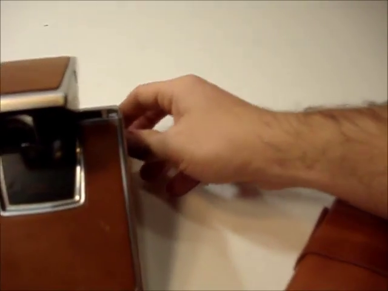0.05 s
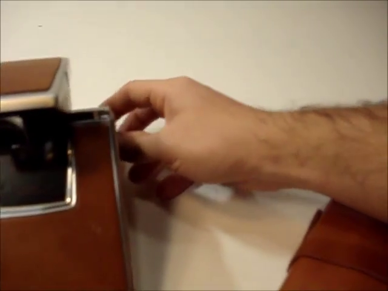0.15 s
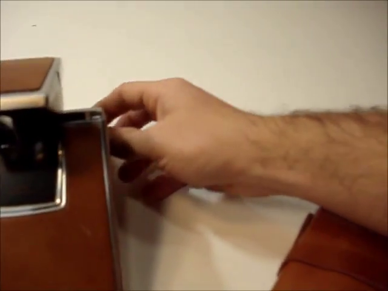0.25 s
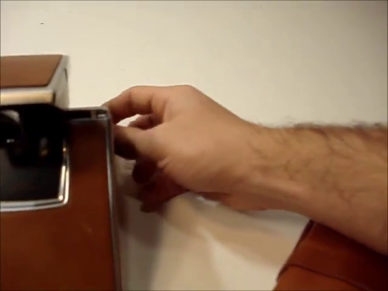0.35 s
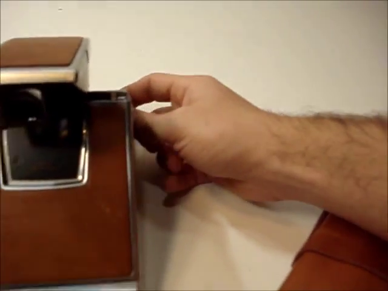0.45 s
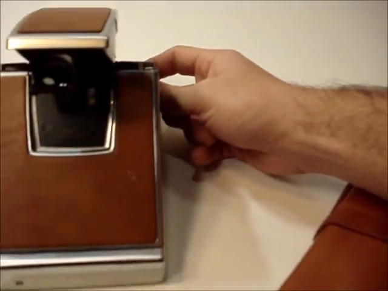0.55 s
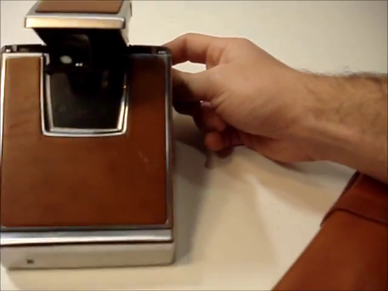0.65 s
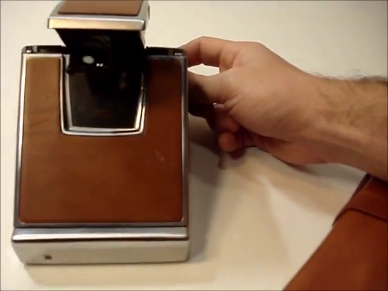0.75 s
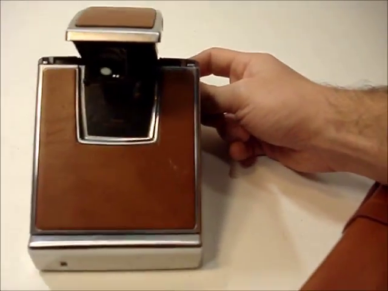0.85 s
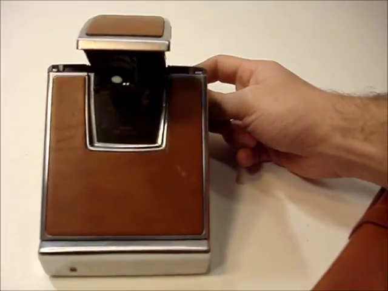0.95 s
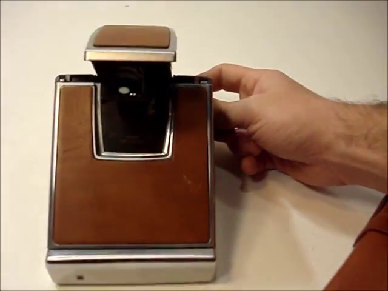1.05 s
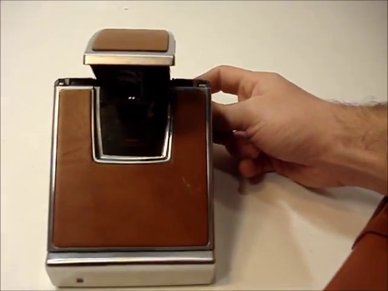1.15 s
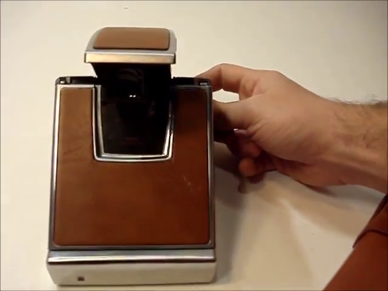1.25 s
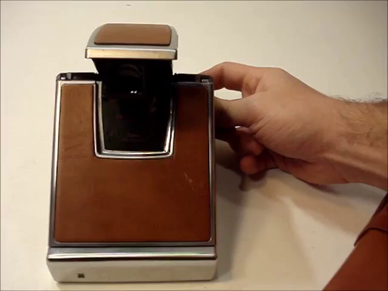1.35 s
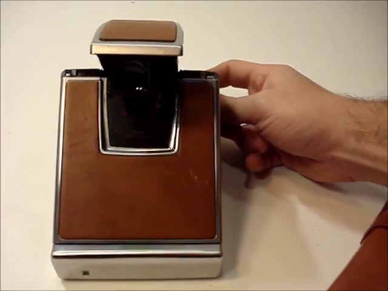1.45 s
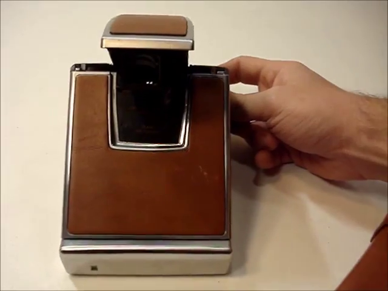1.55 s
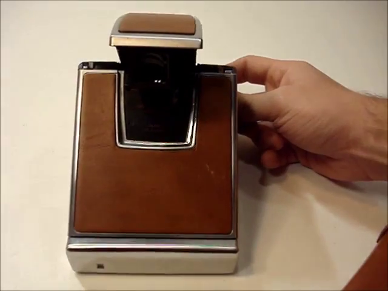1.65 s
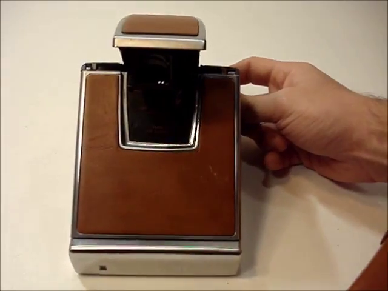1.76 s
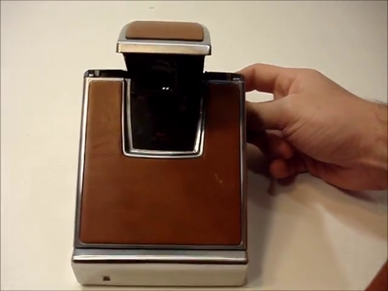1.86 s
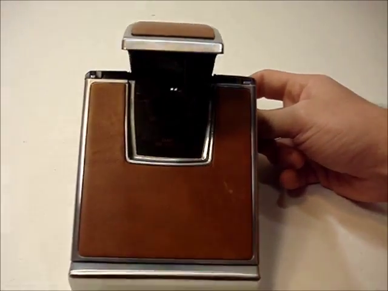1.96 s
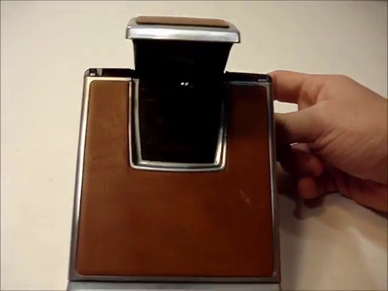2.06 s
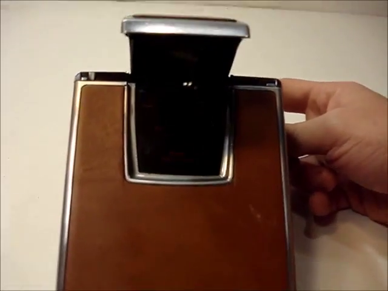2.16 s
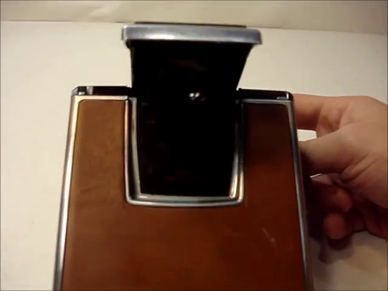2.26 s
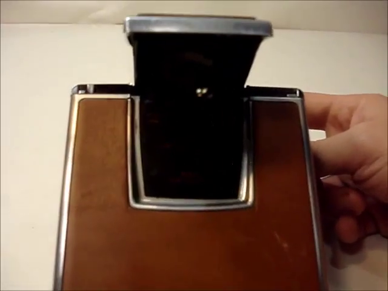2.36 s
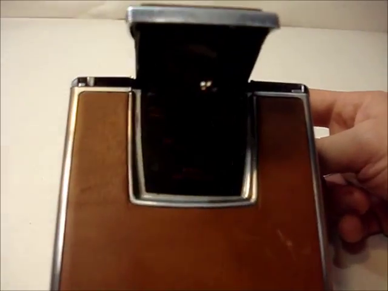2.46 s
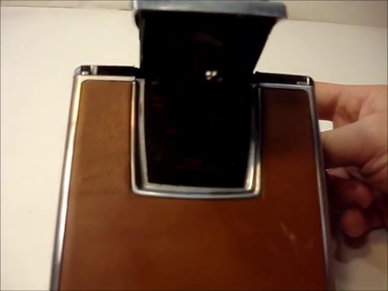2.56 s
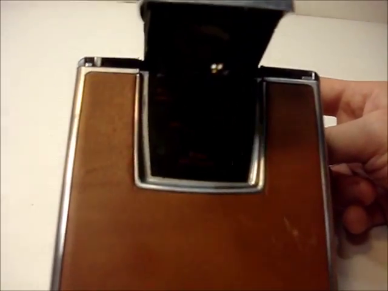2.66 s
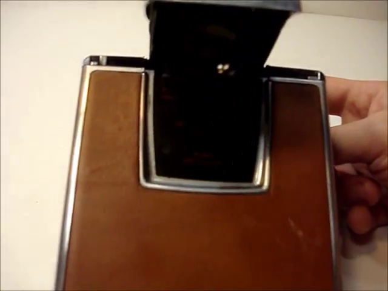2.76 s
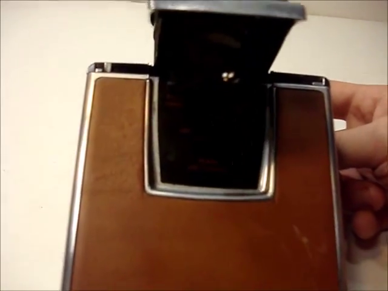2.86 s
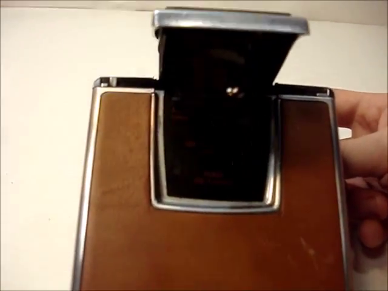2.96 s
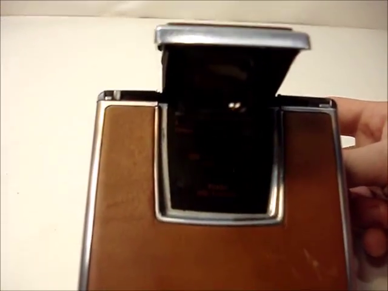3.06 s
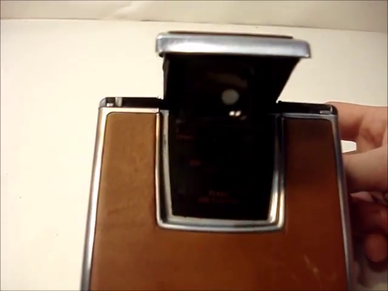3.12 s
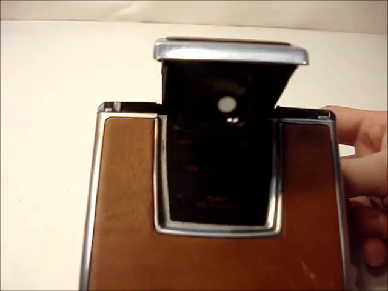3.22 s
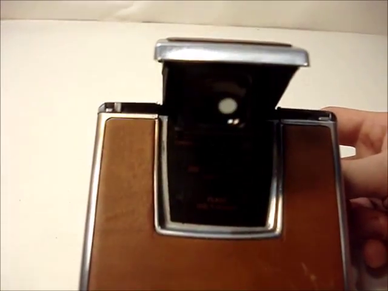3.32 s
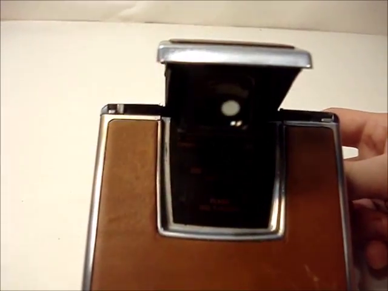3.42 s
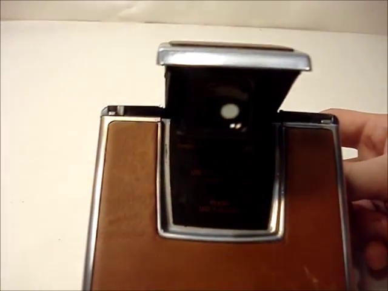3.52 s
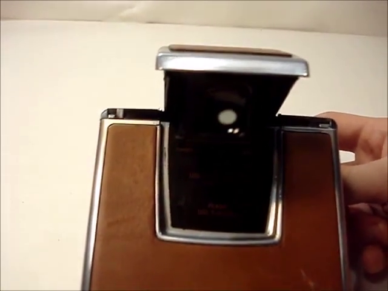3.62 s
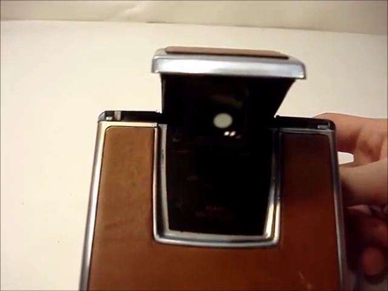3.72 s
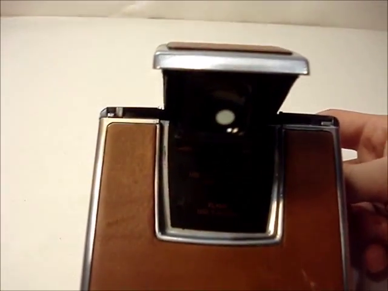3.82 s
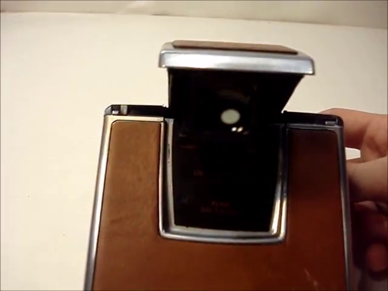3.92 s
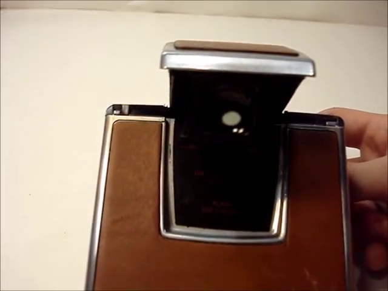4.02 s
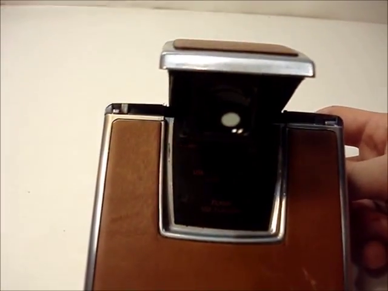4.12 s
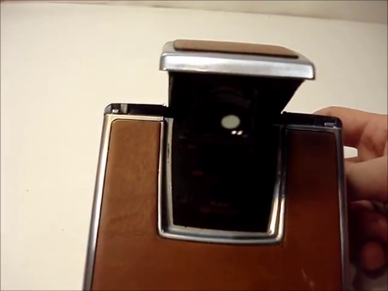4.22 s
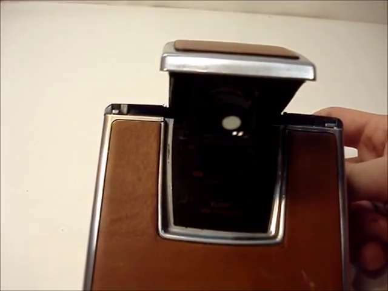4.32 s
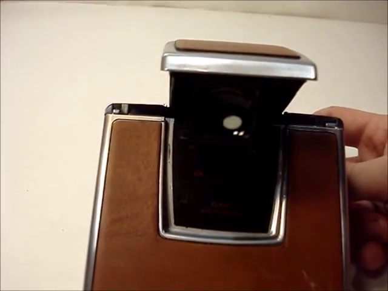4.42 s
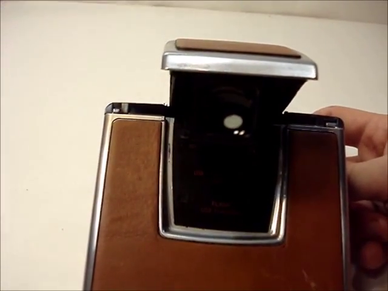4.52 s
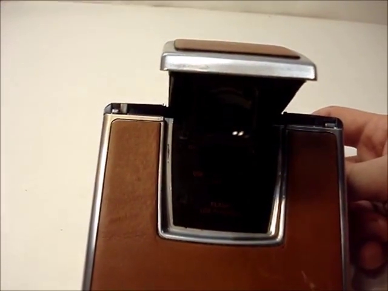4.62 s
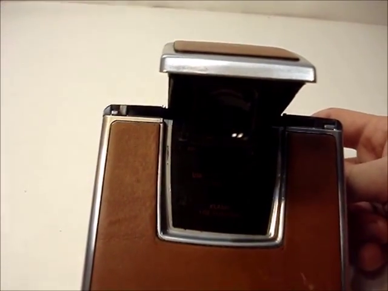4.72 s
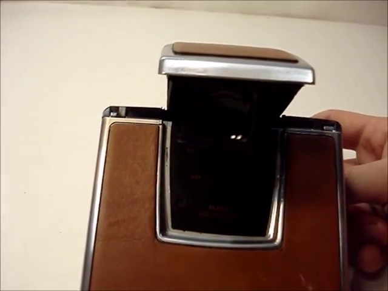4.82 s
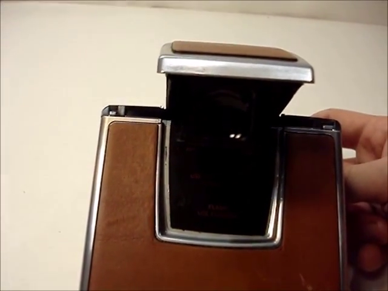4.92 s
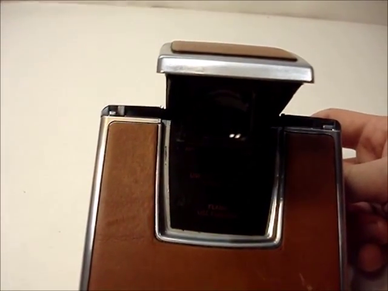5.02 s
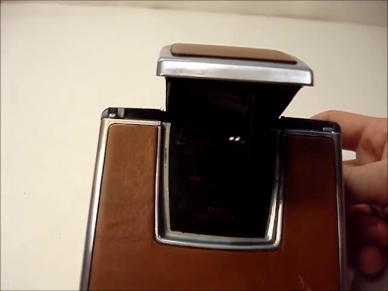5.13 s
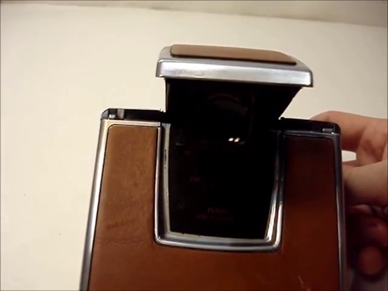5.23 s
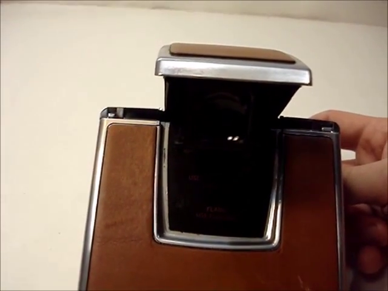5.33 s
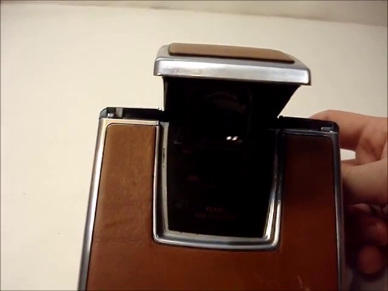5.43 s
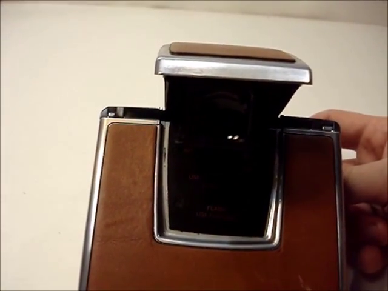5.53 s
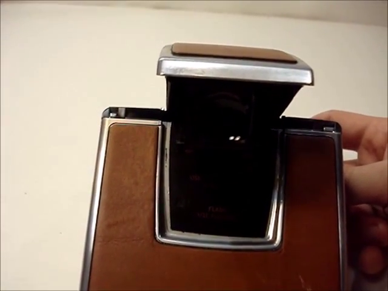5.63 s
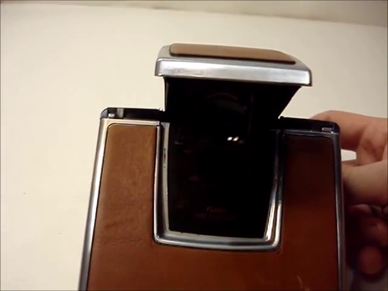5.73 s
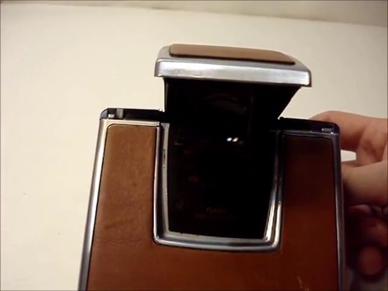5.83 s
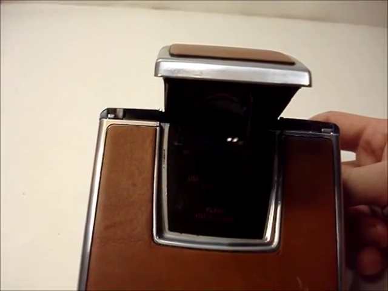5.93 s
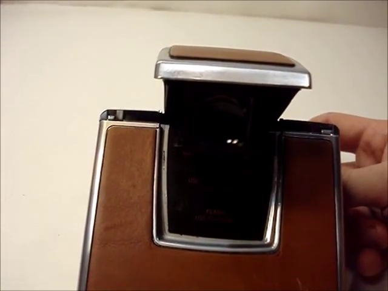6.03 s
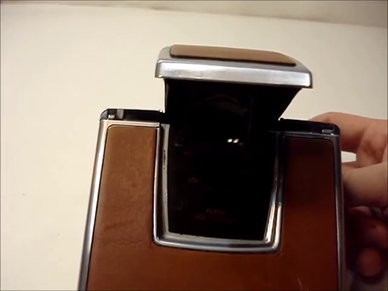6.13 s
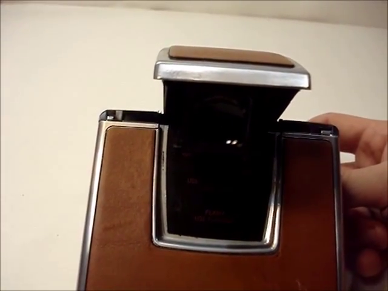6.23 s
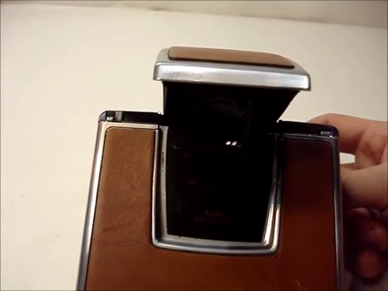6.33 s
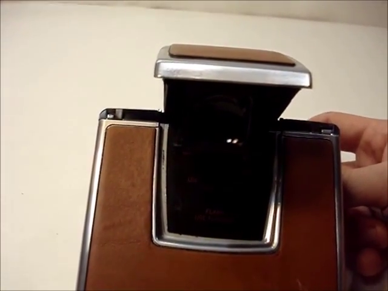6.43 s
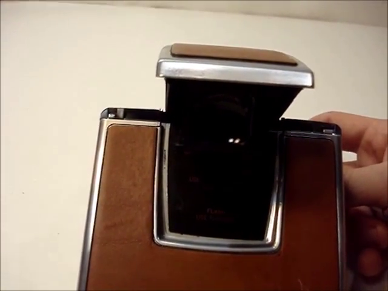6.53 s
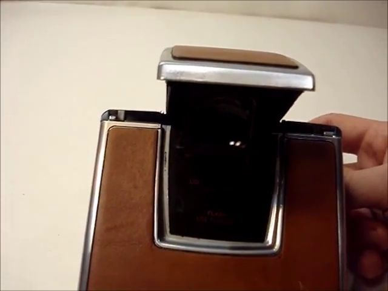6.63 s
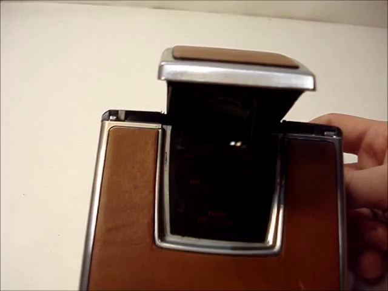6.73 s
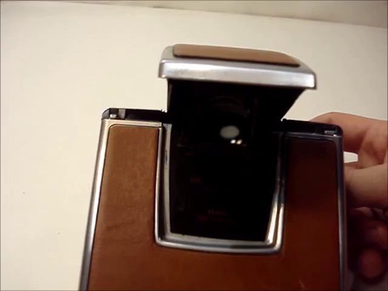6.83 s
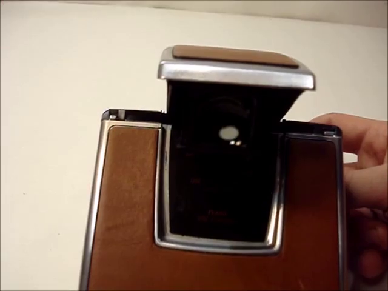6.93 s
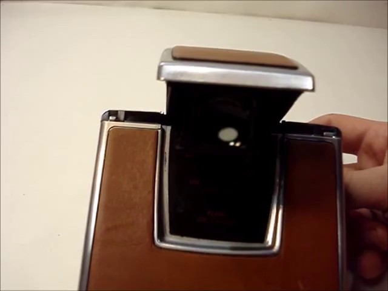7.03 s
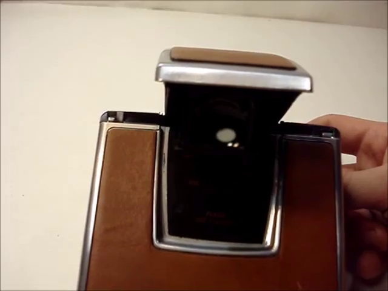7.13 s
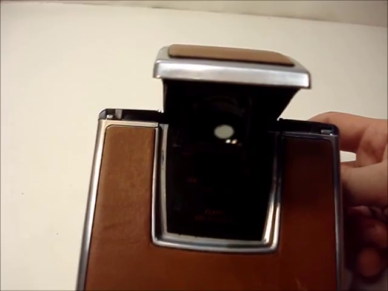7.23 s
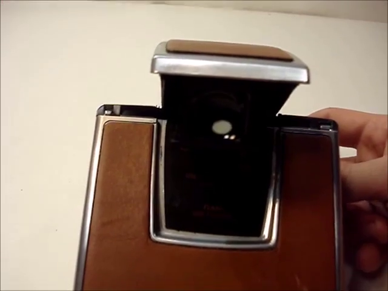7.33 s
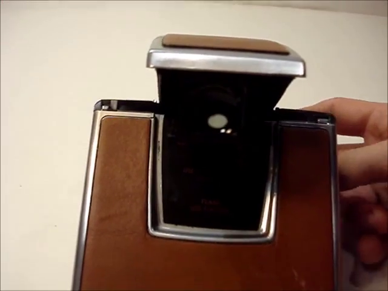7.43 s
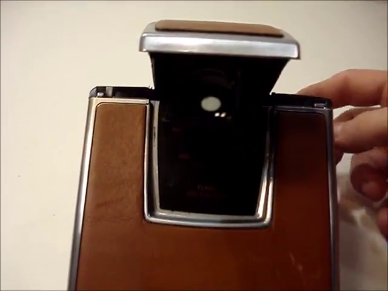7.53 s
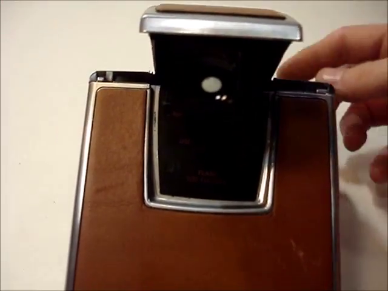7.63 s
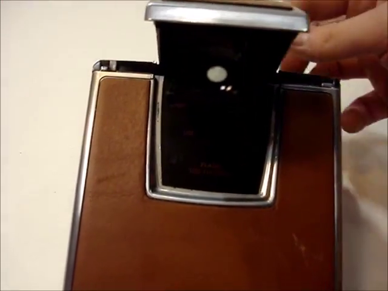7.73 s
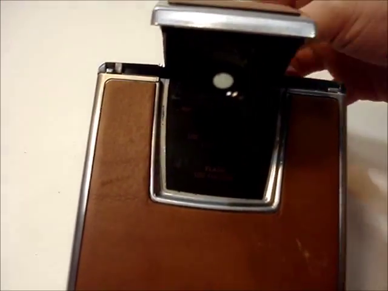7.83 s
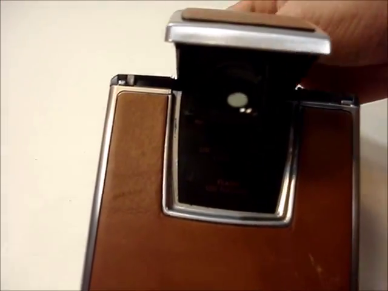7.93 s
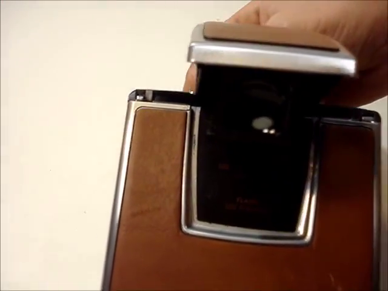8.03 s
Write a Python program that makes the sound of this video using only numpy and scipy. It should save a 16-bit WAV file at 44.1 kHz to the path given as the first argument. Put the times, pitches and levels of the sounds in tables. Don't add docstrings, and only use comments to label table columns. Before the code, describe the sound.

A folding instant camera on a table fires twice: button click, short motor whirr, hard hollow shutter clack, longer gear whirr, then a soft clunk and faint springy hum.

```python
import sys
import numpy as np
from scipy import signal
from scipy.io import wavfile
from scipy.ndimage import uniform_filter1d, minimum_filter1d

SR = 44100
rng = np.random.default_rng(int(sys.argv[2]) if len(sys.argv) > 2 else 0)


def gain_from_db(level_db):
    decades = np.asarray(level_db, float) / 20
    return 10 ** decades


def unload_audio(sound):
    columns = np.transpose(np.atleast_2d(sound))
    steps = np.round(np.clip(columns, -1, 1) * 32767)
    wavfile.write(sys.argv[1], SR, steps.astype(np.int16))


N = 356019

SWITCH_ON_S = [
    1.272,
    1.585,
    4.719,
    5.065,
]
# (time [s], settled shaft speed [turns/s], gear rattle [dB])
RAISE_1 = [(1.316, 149, -28), (1.36, 151, -25), (1.39, 151, -24.5), (1.42, 155, -22)]
RAISE_2 = [(4.76, 135, -28.5), (4.82, 138, -28), (4.872, 137, -24)]
# (time [s], settled shaft speed [turns/s], gear rattle [dB])
WIND_1 = [(1.74, 160, -28), (1.8, 155.5, -28), (1.852, 150.8, -27.5), (1.961, 155.3, -29),
          (2.175, 155.7, -28.5), (2.305, 148.2, -26), (2.851, 141, -26), (3.145, 138, -26),
          (3.295, 122, -26)]
WIND_2 = [(5.234, 138.5, -28), (5.36, 127.8, -27.5), (5.494, 135.3, -28.5), (5.718, 135.5, -27),
          (5.888, 129.3, -27), (6.07, 131.5, -26.5), (6.33, 127.6, -27.5), (6.82, 124.2, -27.5),
          (6.99, 108, -31)]
# (time [s], length [s], shaft order [1], level
# [dB])
SURGES = [(1.395, .04, 3, 4.5), (1.37, .02, 6, 3), (1.7, .04, 9, 8), (2.26, .06, 9, -9),
          (2.975, .06, 6, 9.5), (3.2, .06, 6, 5), (3.228, .022, 0, 6), (4.85, .04, 3, 3), (4.835, .03, 6, 5),
          (6.02, .19, 6, 9.5), (6.918, .018, 0, 7.5), (6.91, .06, 7, 10), (6.76, .07, 7, -3),
          (5.32, .12, 12, 5), (5.5, .3, 4, -6), (6.4, .12, 4, 5), (6.0, .1, 5, 6), (2.0, .25, 12, 3),
          (4.775, .02, 9, 4), (1.305, .025, 9, 7), (1.635, .015, 9, 3)]
# (frequency [Hz], width [Hz], level [dB])
FRAME = [(345, 44, -36.5), (378, 34, -33), (405, 26, -31.7), (436, 34, -26), (468, 30, -31.3),
         (700, 90, -36), (795, 90, -37.5), (878, 36, -36), (935, 50, -47), (1125, 30, -44), (1178, 36, -41),
         (1232, 56, -43), (1362, 34, -40), (1398, 36, -33)]
SHAFT_ORDERS = {1: -38, 2: -31, 4: -17, 5: -20, 7: -21.5, 8: -19, 10: -19.5, 11: -21.5, 12: -17, 13: -19,
                14: -20.5, 15: -20.5, 16: -20.5}
# (shaft order [1], blur [Hz], level [dB])
MESH = [(23.83, 27, -18.5), (35.87, 80, -19), (47.4, 240, -14.5)]
# (frequency [Hz], density [dB per Hz])
FAR = [(59, -62), (100, -37), (367, -29), (437, -13), (530, -13), (607, -18), (986, -17.5), (1400, -15.5),
       (3280, -9.5), (7130, -7.5), (9170, -7), (10300, -25.5), (13400, -78), (22000, -120)]
NEAR = [(59, -64), (100, -30), (326, -36), (389, -10), (454, -22), (766, -15), (967, -25), (2060, -12.5),
        (4140, -10.5), (4650, -9.5), (7850, -7.5), (10300, -17.5), (13400, -76), (22000, -120)]
# (frequency [Hz], width [Hz], gain [dB])
SHELL = [(122.6, 9.2, 11.5), (497, 36, -10), (518, 16, 11.5), (517, 17, -6.5), (570, 40, 3), (770, 31, 7.5),
         (874.5, 13, 13.5), (1008, 30, 4.5), (1238, 85, 5.5), (1438, 140, 4), (1626, 21, 7.5),
         (1770, 26, 7), (1851.6, 28, 7), (1960, 22, 1.5), (2050, 130, 6), (2620, 240, 6.5), (3440, 118, 7),
         (4420, 89, 6.5), (4705, 190, 8.5), (5190, 230, 7), (5700, 58, 6), (6340, 140, -1.5),
         (7260, 216, 4.5), (7330, 75, 5)]
PARTS = {"button": (0, -20, -20, .06, .0028), "latch": (0, -17, -21, .052, .0021),
         "lever": (-5, 0, -14, .145, .0026), "pin": (-8, 0, -18, .045, .0022),
         "body": (-22, -18, 0, .045, .002), "slap": (0, -18, 0, .066, .0024),
         "shutter": (-9, -15, 0, .06, .0023), "mirror up": (0, -5, -13, .05, .0048),
         "mirror home": (0, -25, -15, .09, .008)}
STRIKES = {"latch": [(.245, -38), (1.2755, -14.5), (1.5304, -14), (1.5975, -12.5), (3.2204, -11),
           (3.2345, -14), (4.7146, -12.5), (4.9886, -12.5), (5.063, -30), (5.0731, -13), (6.9116, -11)],
           "button": [(1.2592, -18), (4.6968, -14.5)], "lever": [(1.48, -27), (4.9467, -26.5)],
           "pin": [(1.5134, -25), (6.93, -25)], "body": [(1.3189, -25), (1.5444, -11), (3.2794, -17.5),
           (5.0193, -13)], "slap": [(1.4294, -20), (4.8748, -18), (5.0094, -14.5), (6.9694, -18)],
           "shutter": [(1.5219, 1.8), (4.9954, -1.5)], "mirror up": [(1.406, -8), (4.858, -7)],
           "mirror home": [(3.2134, -14), (6.9051, -19)]}
# (frequency [Hz], density [dB per Hz])
CHATTER = [(880, -1.5), (1500, -8.5), (2300, -11.5), (2980, 2.5), (3580, -3.5), (7520, -3.5), (10300, -16),
           (13400, -68), (22000, -120)]
# (frequency [Hz], level [dB], t60 [s])
CLINK = [(1195, -5, 0.004), (1515, 2, 0.0085), (1740, -12, 0.0048), (2010, 1, 0.0071)]
# (frequency [Hz], level [dB], t60 [s])
KNOCK = [(230, -7.5, 0.28), (306, -3.5, 0.06), (430, -2, .045), (573, 6.5, 0.044), (659, 16.5, 0.021),
         (725, 7.5, 0.05), (940, -32, 0.046)]
# (time [s], peak [dB], length [s])
PUFFS = [
    (1.4075, -24.5, .0035),
    (1.519, -35, .008),
    (3.219, -23, .017),
    (4.862, -24, .0038),
    (4.9945, -22, .006),
    (6.91, -22, .016),
]
# (time [s], level [dB])
PLUCKS = [
    (3.22, 1.5),
    (6.92, -.6),
]
# (frequency [Hz], level [dB])
SPRING = [(349.9, -61), (1050, -63.5), (1400, -62.5), (1755, -61.5), (2105, -59.5), (2455, -69),
          (2805, -67), (3505, -77), (4560, -72), (5259, -77), (6315, -99)]
# (frequency [Hz], density [dB per Hz])
HISS = [(12, -41), (20, -41), (80, -11), (153, -4.5), (303, -2), (597, -4.5), (796, -6.5), (907, -7.5),
        (2860, -14.5), (7730, -20.5), (10300, -27), (13400, -56), (22000, -120)]
# (time [s], length [s], level below 1 kHz [dB], level above 2 kHz [dB])
STARVED = [
    (1.243, .014, 0, -25),
    (1.498, .016, -25, -30),
    (4.664, .029, 0, -28),
    (4.976, .011, -6, -6),
]
# (time [s], depth kept under the local top [dB])
COARSE = [(1.75, 9), (1.862, 7), (2.35, 7), (2.435, 8), (3.19, 10), (3.228, 6), (5.36, 9), (5.53, 9),
          (5.69, 9), (6.0, 9), (6.05, 4), (6.215, 8), (6.26, 9), (6.34, 8), (6.63, 4.5), (6.685, 7),
          (6.728, 7), (6.79, 8)]

SPIN_UP_S, SILENT_S = .048, .009
RATTLE_DB_PER_OCTAVE = 6.5
LEAK_DB = -52
SHAKE_DB = 6.0
THIN_HZ, OPEN_HZ, ROLLED_OFF_HZ = 300, 20000, 4300
STRIKE_SAMPLES, PUFF_SAMPLES = 8000, 9000
JOLT_DB, JOLT_S, SAG_DB_PER_S = 13, .05, 3.0
DAMPED_S, DAMP_DB_PER_S, HUM_S = .47, 110, .78
HISS_DB, ROOM_DB = -51.5, -9.5
COARSE_S, EDGE_HZ = .029, 10220


def motor(on, rows, colour):
    s, settled, load_db = np.transpose(rows)
    t = np.arange(on + SILENT_S, s[-1], 1 / SR)
    spun = 1 - np.exp(-(t - on) / SPIN_UP_S)
    speed = spun * np.interp(t, s, settled)
    rattle_db = np.interp(t, s, load_db) + RATTLE_DB_PER_OCTAVE * np.log2(spun)
    wobble = 1 + 0.001 * drift(len(t), per_s=6.54)
    angle = 2 * np.pi * np.cumsum(speed * wobble) / SR
    acceleration = uniform_filter1d(np.gradient(speed) * SR, size=900)
    strain = np.clip(abs(acceleration) / 1200, .03, .8)
    poles = pole_tones(t, speed, angle, strain)
    lines = shaft_orders(t, speed, angle) + tooth_mesh(t, speed, angle, strain)
    rattle = gain_from_db(-1.03 + surge_db(t, 0)) * gear_rattle(angle, colour)
    whir = gain_from_db(rattle_db) * (rattle + lines)
    fade = signal.windows.tukey(len(t), 0.042 / (s[-1] - t[0]))
    return t[0], poles * fade, whir * fade


def pole_tones(t, speed, angle, strain):
    poles = np.zeros(len(t))
    for order, shake in ((3, .1), (6, 1), (9, 1)):
        db = frame_db(order * speed[::16]) + surge_db(t[::16], order)
        db = np.repeat(db, 16)[:len(t)]
        db += .6 * drift(len(t), per_s=6.0) + SHAKE_DB * shake * strain
        shaken = shake * strain
        grain = np.sqrt(1 - shaken) + np.sqrt(shaken) * fuzz(len(t), width_hz=64)
        body = 1 / (1 + ((order * speed - 800) / 90) ** 2)
        grain *= 1 - shaken * (1 - body)
        poles += np.sqrt(2) * gain_from_db(db) * (grain * np.exp(1j * order * (angle + 1))).real
    return poles


def shaft_orders(t, speed, angle):
    lines = np.zeros(len(t))
    for order in set(range(1, 64)) - {3, 6, 9}:
        level_db = SHAFT_ORDERS.get(order, -17 - 0.32 * order) - 2.0 + surge_db(t[::64], order)
        wander = gain_from_db(level_db + min(.3 * order, 1.8) * drift(len(t), per_s=3, size=64))
        slip = 0.022 * order * drift(len(t), per_s=8.4) + 2 * np.pi * rng.random()
        body = np.repeat(wander * bumps(order * speed[::64]) ** 1.4, 64)[:len(t)]
        lines += body * np.cos(order * angle + slip)
    return lines


def tooth_mesh(t, speed, angle, strain):
    bands = np.zeros(len(t))
    for order, blur_hz, db in MESH:
        swell = gain_from_db(db + SHAKE_DB * strain + 1.2 * drift(len(t), per_s=5))
        swell *= np.repeat(bumps(order * speed[::64]), 64)[:len(t)]
        bands += np.sqrt(2) * swell * (fuzz(len(t), blur_hz) * np.exp(1j * order * angle)).real
    return bands


def gear_rattle(angle, colour):
    count = len(angle)
    beat = 3 * angle / (2 * np.pi) + .25 * fuzz(count, width_hz=150).real
    knocks = np.diff(np.floor(np.maximum.accumulate(beat)), prepend=0)
    kicks = knocks * gain_from_db(3.0 * rng.standard_normal(count))
    teeth = 1.2 + evened(signal.lfilter([1], [1, -np.exp(-1 / (.001 * SR))], kicks))
    return evened(teeth * noise(count, lambda hz: shell(colour, hz), patchy_db=1.5))


def frame_db(hz):
    power = sum(gain_from_db(db) ** 2 / (1 + ((hz - f) * 2 / width) ** 2) ** 2 for f, width, db in FRAME)
    return 10 * np.log10(gain_from_db(LEAK_DB) ** 2 + power)


def surge_db(t, k):
    return sum(db * np.exp(-((t - s) / length) ** 2) for s, length, order, db in SURGES if round(order) == k)


def bumps(hz):
    return gain_from_db(sum(db / (1 + ((hz - f) * 2 / width) ** 2) for f, width, db in SHELL))


def shell(colour, hz):
    return gain_from_db(read(colour, hz)) * bumps(hz) ** .7


def hit(s, bright_db, clink_db, knock_db, t60, rise, top_hz):
    t = np.arange(STRIKE_SAMPLES) / SR
    chatter = gain_from_db(-60 * np.maximum(t - rise, 0) / t60) * np.minimum(t / max(rise, 1e-4), 1)

    def small_parts(hz):
        return gain_from_db(read(CHATTER, hz)) / (1 + (THIN_HZ / (hz + 1)) ** 2) / (1 + (hz / top_hz) ** 4)

    bright = noise(len(t), small_parts, patchy_db=0) * chatter
    clink = ring(CLINK, rng.standard_normal(len(t)) * chatter)
    push = t / 0.00025
    blow = (push - 1) * np.exp(-push) + 0.053 * rng.standard_normal(len(t)) * chatter ** 2
    knock = ring(KNOCK, blow)
    return s, gain_from_db(bright_db - 10) * bright + gain_from_db(clink_db + 2.0) * clink + gain_from_db(knock_db - 3.0) * knock


def ring(modes, burst):
    t = np.arange(STRIKE_SAMPLES) / SR
    body = np.zeros(len(t))
    for hz, db, t60 in modes:
        body += gain_from_db(db - 60 * t / t60) * np.sin(2 * np.pi * hz * rng.uniform(0.97, 1.02) * t)
    rung = signal.fftconvolve(burst, body)[:len(t)]
    return rung / abs(rung).max()


def puff(s, peak_db, length):
    u = np.arange(PUFF_SAMPLES) / SR / length
    hump = np.sin(np.pi * np.minimum(u, 1) ** 0.53) ** 1.3
    back = np.maximum(u - .8, 0) / 1.3
    return s, gain_from_db(peak_db) * (hump - .9 * back * np.exp(-back) * np.cos(.6 * back))


def spring(s, pluck_db):
    t = np.arange(0, HUM_S, 1 / SR)
    level_db = pluck_db + JOLT_DB * np.exp(-t / JOLT_S) - SAG_DB_PER_S * t
    level_db -= DAMP_DB_PER_S * np.maximum(t - DAMPED_S, 0)
    modes = np.zeros(len(t))
    for hz, db in SPRING:
        level = gain_from_db(db + 0.83 * drift(len(t), per_s=0.83))
        modes += level * np.sin(2 * np.pi * (hz * t + rng.random()))
    return s, np.sqrt(2) * gain_from_db(level_db) * modes * signal.windows.tukey(len(t), .1)


def room(x):
    out = np.zeros(N)
    turn = np.arange(N) / SR * 2 * np.pi * 3
    for k in range(3):
        hz, t, z = signal.stft(rng.standard_normal(SR // 2), SR, nperseg=256)
        t60 = read([(200, 0.12), (1000, 0.24), (8000, 0.16)], hz)
        tail = signal.istft(z * gain_from_db(-60 * t / t60[:, None]), SR, nperseg=256)[1]
        share = np.sqrt(2 / 3) * np.cos(turn + k * np.pi / 3)
        delayed = np.r_[np.zeros(150), tail / np.linalg.norm(tail)]
        out += signal.oaconvolve(x * share, delayed)[:N]
    return out


def steady_hiss():
    return gain_from_db(HISS_DB) * noise(N, lambda hz: gain_from_db(read(HISS, hz)), patchy_db=1.3)


def noise(count, gain, patchy_db):
    hz = np.fft.rfftfreq(1024, 1 / SR)
    a, b, patches = rng.standard_normal((count // 256 + 5, 513, 3)).T
    patches = uniform_filter1d(patches, size=8, axis=0)
    patches = evened(uniform_filter1d(patches, size=10, axis=1))
    z = (a + 1j * b) * gain(hz)[:, None] * gain_from_db(patchy_db * patches)
    return evened(signal.istft(z, nperseg=1024, noverlap=768)[1][:count])


def fuzz(count, width_hz):
    r = np.exp(-np.pi * width_hz / SR)
    z = rng.standard_normal(count) + 1j * rng.standard_normal(count)
    z = signal.lfilter([1], [1, -2 * r, r * r], z)
    return z / np.sqrt(np.mean(abs(z) ** 2))


def drift(count, per_s, size=1):
    knots = rng.standard_normal(int(count / SR * 40) + 3)
    knots = signal.lfilter([1], [1, -np.exp(-per_s / 40 * 2 * np.pi)], knots)
    return evened(np.interp(np.arange(0, count, size) / SR * 40, np.arange(len(knots)), knots))


def evened(x):
    return x / np.sqrt(np.mean(x ** 2) + 1e-20)


def read(points, hz):
    f, value = np.transpose(points)
    return np.interp(np.log(hz + 1), np.log(f + 1), value)


def add(mix, s, sound):
    part = mix[round(s * SR):][:len(sound)]
    part += sound[:len(part)]


def scene():
    camera, tones = np.zeros((2, N))
    loads = (RAISE_1, WIND_1, RAISE_2, WIND_2)
    for on, rows, colour in zip(SWITCH_ON_S, loads, (FAR, FAR, NEAR, NEAR)):
        s, poles, whir = motor(on, rows, colour)
        add(tones, s, poles)
        add(camera, s, whir)
    for part, (bright_db, clink_db, knock_db, t60, rise) in PARTS.items():
        top_hz = ROLLED_OFF_HZ if part == "button" else OPEN_HZ
        for s, db in STRIKES[part]:
            add(camera, *hit(s, db + bright_db, db + clink_db, db + knock_db, t60, rise, top_hz))
    wet = tones + camera + gain_from_db(ROOM_DB) * room(camera)
    for row in PUFFS:
        add(wet, *puff(*row))
    for row in PLUCKS:
        add(wet, *spring(*row))
    return np.tile(wet + steady_hiss(), (2, 1))


def coarse(x):
    hz, t, z = signal.stft(x, SR, nperseg=1024, noverlap=896)
    level_db = 10 * np.log10(uniform_filter1d(abs(z) ** 2, size=5, axis=1) + 1e-20)
    under_db = -minimum_filter1d(-level_db, size=25, axis=0) - level_db
    kept_db = np.min([np.where(abs(t - s) < COARSE_S / 2, db, np.inf) for s, db in COARSE], axis=0)
    kept_db = kept_db * read([(700, 3), (2500, 1)], hz)[:, None]
    z = z * np.where(under_db > kept_db, gain_from_db(-30), 1)
    return signal.istft(z, SR, nperseg=1024, noverlap=896)[1][:N]


def starved(hz, t, z):
    for s, length, low_db, high_db in STARVED:
        inside = np.clip((length / 2 - abs(t - s - length / 2)) / 0.0026 + .5, 0, 1)
        curve = [(800, low_db), (1000, low_db / 5), (1500, low_db / 5), (2100, high_db)]
        z = z * gain_from_db(read(curve, hz)[:, None] * inside)
    return z


def holes(hz, t, z):
    cell = (np.arange(len(hz))[:, None] // 4, np.arange(len(t)) // 6)
    power = uniform_filter1d(uniform_filter1d(abs(z) ** 2, size=4, axis=0), size=6, axis=1)
    nearby = uniform_filter1d((abs(z) ** 2).mean(axis=0), size=50)
    under_db = 10 * np.log10((nearby + 1e-20) / (power + 1e-20))
    chance = np.clip(.04 * (under_db - 9), .015, .6) * read([(2500, .05), (5500, 1)], hz)[:, None]
    return z * np.where(rng.random((len(hz), len(t)))[cell] < chance, gain_from_db(-35), 1)


def band_limit(x):
    return signal.sosfilt(signal.butter(12, 10760, fs=SR, output="sos"), x)


def record(dry):
    hz, t, z = signal.stft(coarse(dry[0]), SR, nperseg=256, noverlap=192)
    z = holes(hz, t, starved(hz, t, z))
    x = signal.istft(z, SR, nperseg=256, noverlap=192)[1][:N]
    overloaded = np.tanh(x / 1.8) * 1.8
    band = signal.firwin(301, EDGE_HZ, window=("kaiser", 8), fs=SR)
    x = signal.oaconvolve(overloaded, band, "same")
    return band_limit(np.tile(x, (2, 1)))


dry = scene()
out = record(dry)
unload_audio(out)
```